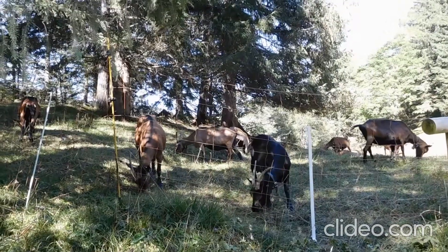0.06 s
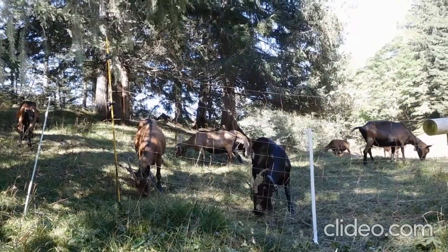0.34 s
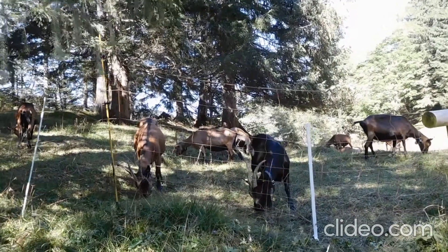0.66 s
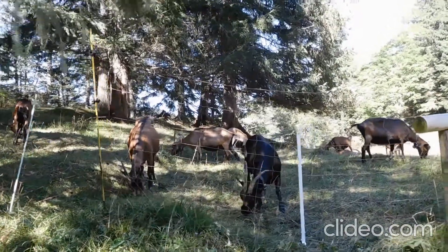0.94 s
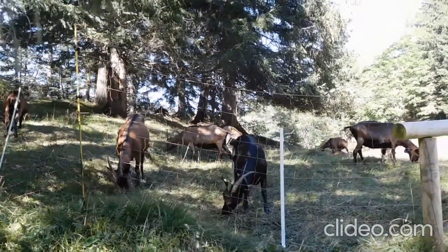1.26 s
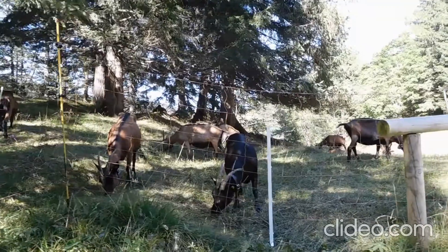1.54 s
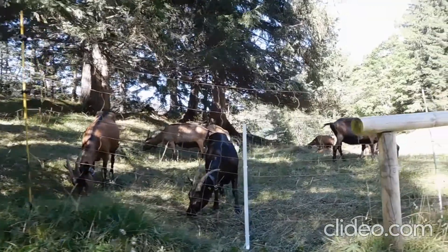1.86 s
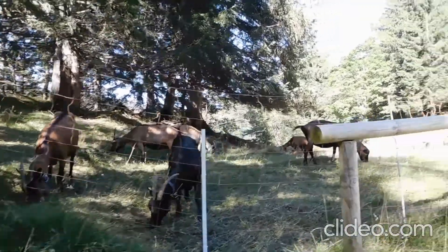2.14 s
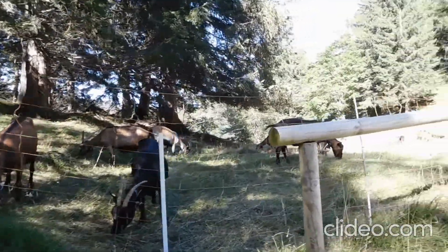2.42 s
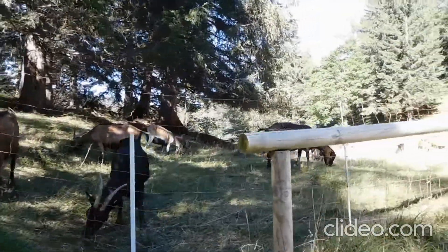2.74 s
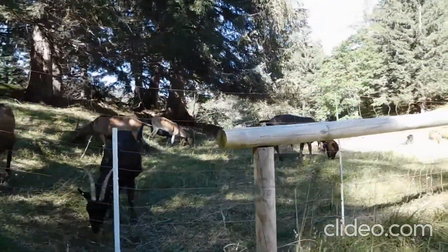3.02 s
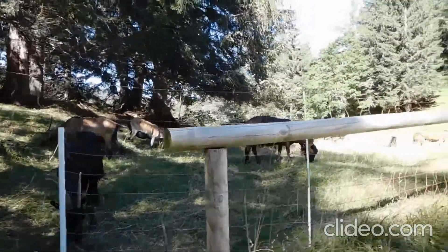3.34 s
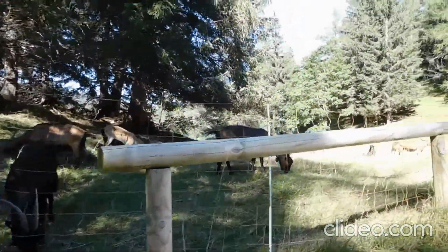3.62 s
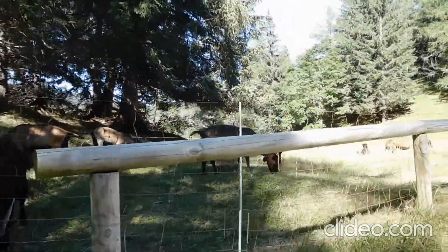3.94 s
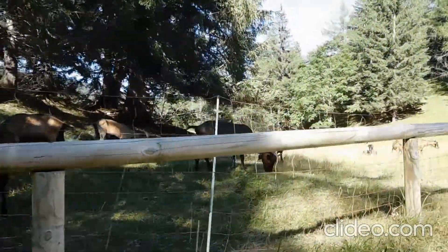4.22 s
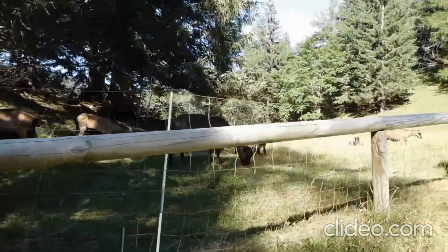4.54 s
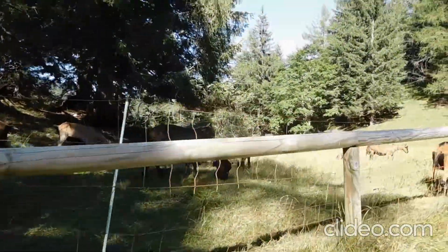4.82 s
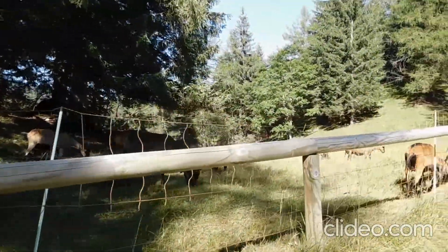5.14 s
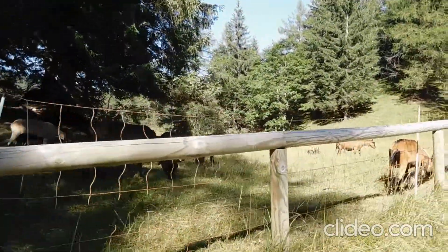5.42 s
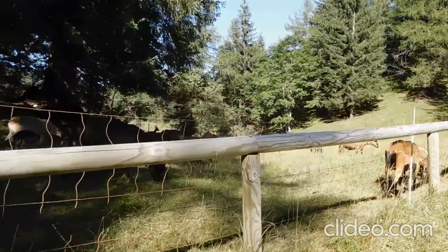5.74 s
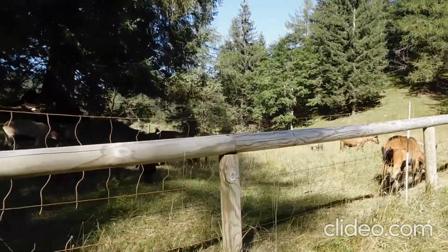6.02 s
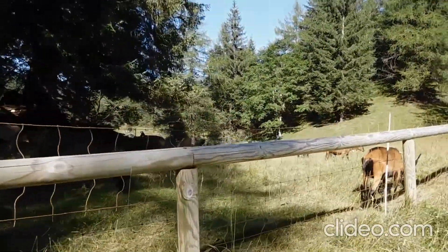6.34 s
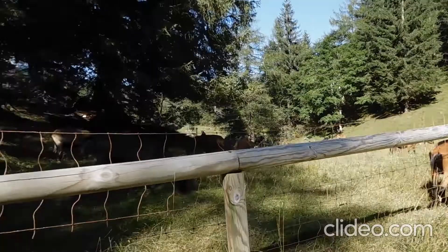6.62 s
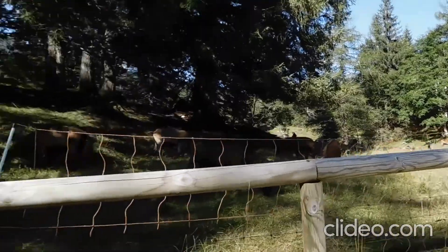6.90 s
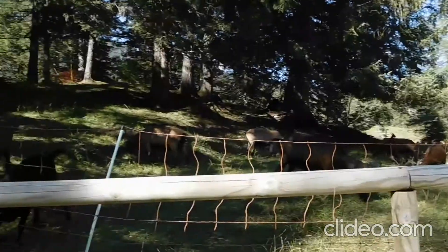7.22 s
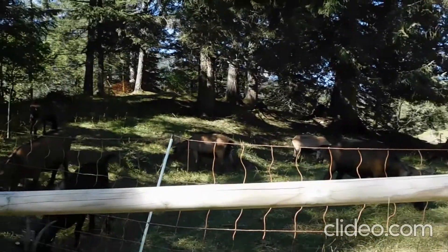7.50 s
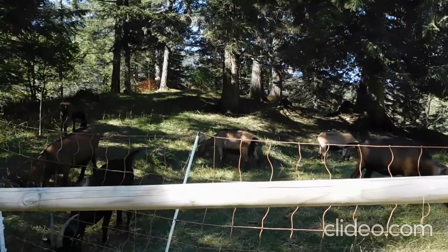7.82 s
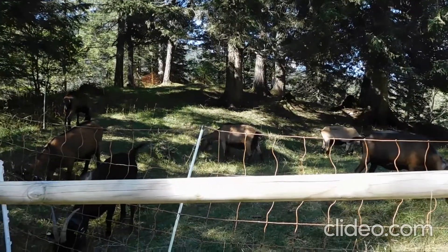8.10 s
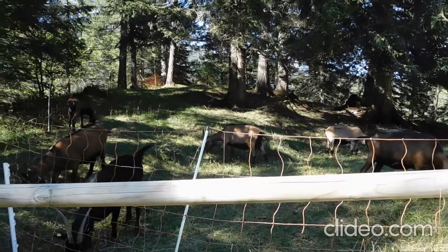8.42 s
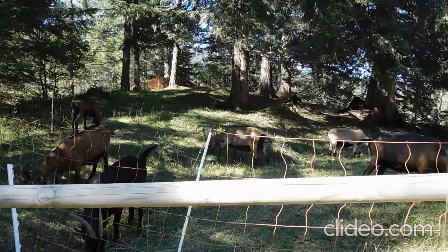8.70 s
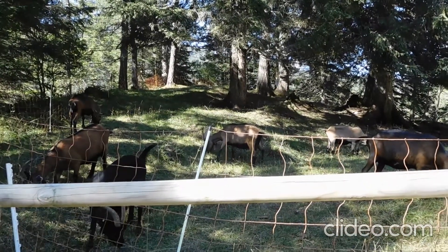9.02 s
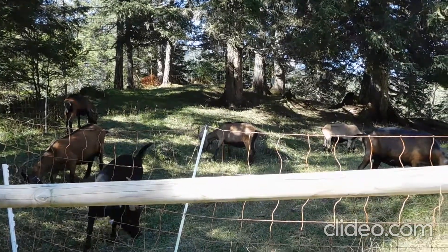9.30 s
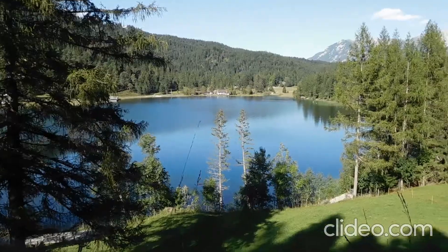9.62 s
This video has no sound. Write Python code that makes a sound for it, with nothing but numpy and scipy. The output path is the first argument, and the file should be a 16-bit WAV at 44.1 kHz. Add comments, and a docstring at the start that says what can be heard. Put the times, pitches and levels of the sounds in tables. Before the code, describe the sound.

Bells on grazing goats clank and ring near and far over a faint rumble of air, followed by wind hissing in trees.

```python
"""Goat bells tinkle and clonk over a low rumble of air at the edge of a spruce wood: three near, three far.
As the goats tug at the grass, clappers knock, skip and slide on the sheet metal and set its modes ringing.
The microphone turns to a faintly hissing meadow and back; hooves tread the grass and snap dry twigs.
The pasture stops abruptly; after a short silence a soft wind hisses in trees above a lake."""
import sys
import numpy as np
from scipy import signal
from scipy.fft import rfft, irfft, next_fast_len
from scipy.io import wavfile
from scipy.ndimage import uniform_filter1d

SR = 44100
rng = np.random.default_rng(int(sys.argv[2]) if len(sys.argv) > 2 else 0)


def waveform_to_disk(signal):
    """Save audio, clipped to [-1, 1], as 16-bit WAV at the path in sys.argv[1]."""
    frames = np.transpose(np.atleast_2d(signal))
    scaled = np.clip(frames, -1, 1) * 32767
    samples = np.round(scaled).astype(np.int16)
    wavfile.write(sys.argv[1], SR, samples)


N = 426006
TIME = np.arange(N) / SR
RING_TIME = TIME[:SR]
PASTURE_END_S, LAKE_START_S = 9.207, 9.372
CUTOFF_HZ = 15750


def from_db(db):
    """Decibels to gain."""
    return 10 ** (np.asarray(db) / 20)


def curve(rows, at):
    """Read a two-column table between its rows."""
    return np.interp(at, *np.transpose(rows))


def decay(s, t60):
    """Falls by 60 dB in t60 seconds."""
    return np.exp(-np.log(1000) * s / t60)


def flicker(per_s):
    """A random line that takes a new value per_s times a second."""
    return np.interp(TIME * per_s, np.arange(N), rng.standard_normal(N))


def add(track, s, sound):
    """Mix a sound in from time s on."""
    start = max(int(s * SR), 0)
    part = track[..., start:start + sound.shape[-1]]
    part += sound[..., :part.shape[-1]]


def noise(spectrum, alike):
    """Stereo noise of rms 1 with the given colour and left-right likeness."""
    hz, db = np.transpose(spectrum)
    size = next_fast_len(N)
    bins = np.maximum(np.arange(size // 2 + 1) * SR / size, 1)
    colour = from_db(np.interp(np.log(bins), np.log(hz), db, left=-80))
    mid, side = irfft(rfft(rng.standard_normal((2, size))) * colour, size)[:, :N]
    both = np.sqrt(1 + alike) * mid + np.sqrt(1 - alike) * np.array([side, -side])
    return both / both.std()


# Air and grass around the microphone. Each row: frequency in Hz, relative density in dB.
RUMBLE_SPECTRUM = [(12, -52.5), (20, -2.5), (38, 3), (70, -5.5), (96, -3), (146, -18), (180, -17.5),
                   (230, -19.5), (400, -120)]
RUSTLE_SPECTRUM = [(120, 3), (250, 2.5), (500, 2), (1000, 7.5), (2000, 1), (3500, -4), (6000, -6),
                   (16000, -27)]
# A faint drone in the distance. Each row: frequency in Hz, rms level in dB.
DRONE_TONES = [(95, -66.5), (203, -64), (214, -63)]


def air(rumble_db, rustle_db, gust_s=5.44, gust_width_s=0.47, gust_db=6):
    """The air rumbles and swells once in a light gust, grass rustles, a far drone wavers."""
    swell_db = gust_db * np.exp(-((TIME - gust_s) / gust_width_s) ** 2)
    rumble = from_db(rumble_db + swell_db) * noise(RUMBLE_SPECTRUM, alike=0.78)
    rustle = from_db(rustle_db + 3 * flicker(60)) * noise(RUSTLE_SPECTRUM, alike=0.39)
    drifts = 4.105 * np.cumsum(rng.standard_normal((len(DRONE_TONES), N)), axis=1) / np.sqrt(SR)
    drone = sum(from_db(db) * np.sqrt(2) * np.sin(2 * np.pi * hz * TIME + drift)
                for (hz, db), drift in zip(DRONE_TONES, drifts))
    return rumble + rustle + drone


# A bell sounds in five registers. A full blow: start in seconds, then a relative level in dB for each.
CLONK, CLANK, HUM, RING, SHIMMER = range(5)


def touches(blows, rebound_db, gap_s, skips, fade_db):
    """After each blow the clapper skips on the rim at uneven gaps, too lightly for a clonk."""
    for s, *register_db in blows:
        yield s, np.array(register_db)
        for k, later in enumerate(np.cumsum(gap_s * rng.uniform(.3, 1.7, skips))):
            weaker_db = rebound_db - fade_db * k + 2 * rng.standard_normal()
            yield s + later, np.array(register_db) - [20, 8, 8, 8, 0] + weaker_db


def jiggles(blows, jiggle_db, per_s=2, spread_db=5.5):
    """Each tug at the grass taps the clapper lightly; the livelier the blows, the stronger the taps."""
    times, *registers = np.transpose(blows)
    for k, (late, force) in enumerate(rng.random((int(per_s * PASTURE_END_S), 2))):
        s = (k + late) / per_s
        liveliness_db = np.array([np.interp(s, times, column) for column in registers])
        yield s, liveliness_db - [3, 0, 0, 0, 0] + jiggle_db + spread_db * (2 * force - 1)


def overtones(level_db, t60=.26, low_hz=6360, count=42):
    """The crowd of weak, unevenly spaced high modes of a folded metal shell."""
    hz = low_hz + (CUTOFF_HZ - low_hz) * (np.arange(count) + rng.random(count)) / count
    return np.column_stack([hz, np.full(count, level_db), np.full(count, t60)])


def ringing(hz, t60):
    """Sine and cosine ring of each mode; the jiggle on the collar makes each pitch waver a little."""
    s, hz, t60 = RING_TIME, hz[:, None], t60[:, None]
    build_up = 1 - np.exp(-s / (0.29 / hz + 0.00091))
    envelope = build_up * decay(np.minimum(s, 3 * t60), t60) * np.minimum(1, 10 * (1 - s))
    jiggle_hz, start = rng.uniform(4, 9, hz.shape), rng.random(hz.shape)
    travel_s = 2.5e-5 * np.sin(2 * np.pi * (jiggle_hz * s + start))
    angle = 2 * np.pi * hz * (s + travel_s - travel_s[:, :1])
    return np.vstack([envelope * np.sin(angle), envelope * np.cos(angle)]).astype(np.float32)


def chokes(landings, loss_db=1):
    """Each landing of the clapper damps what still rings: the gain left after all landings so far."""
    landed = np.searchsorted(np.sort([s for s, _ in landings]), np.arange(N + SR) / SR)
    return from_db(-loss_db * uniform_filter1d(landed.astype(float), size=88)).astype(np.float32)


# Clapper against rim, metal on metal. Each row: frequency in Hz, relative density in dB.
CONTACT_SPECTRUM = [(400, -26), (900, 5), (2750, 3), (3750, 5.5), (4300, -0.5), (5350, 6), (6600, 4.5),
                    (12000, 1), (16000, 3.5)]


def shell_noise(modes, width_hz, direct_db):
    """Friction noise, partly direct and partly sung through the modes of the metal; rms 1."""
    size = next_fast_len(N)
    bins = np.arange(size // 2 + 1) * SR / size
    grid = np.arange(0, SR // 2, 10)
    peaks = sum(1 / (1 + ((grid - hz) / width_hz) ** 2) for hz, *_ in modes)
    response = from_db(direct_db) + np.interp(bins, grid, np.minimum(peaks, 1))
    sung = irfft(rfft(noise(CONTACT_SPECTRUM, alike=0.6), size) * response, size)[:, :N]
    return sung / sung.std()


def knocks(blows, contact, level_db):
    """Each blow begins with a short crack of contact noise that follows its shimmer level."""
    s, envelope = RING_TIME[:SR // 10], np.zeros(N)
    knock = (.4 * decay(s, 0.08) + 3 * decay(s, 0.02)) * (1 - np.exp(-s / 0.00014))
    for at, *_, shimmer_db in blows:
        add(envelope, at, from_db(level_db + shimmer_db) * knock)
    return envelope * contact


# The microphone turns to the meadow and back. Each row: time in seconds, degrees to the right.
MIC_TURN = [(0, 9.5), (1.5, 16.6), (2.3, 29.7), (2.9, 35), (4.4, 42), (6.4, 84), (7, 45), (7.4, 29),
            (9.2, 16.4)]
# Its right port hears more clonk, its left more shimmer. Each row: frequency in Hz, left minus right in dB.
MIC_BALANCE = [(2500, -1.2), (8000, 2.3)]
PORT_DELAY_S = .000175


def bell(modes, blows, contact, left_deg, level_db, jiggle_db, overtone_db, knock_db, rebound_db,
         gap_s, buzz, skips=2, fade_db=6):
    """Every touch of the clapper rings all modes of the shell, in a mix that varies at random."""
    hz, mode_db, t60 = np.vstack([modes, overtones(overtone_db)]).T
    register = np.select([hz > 5500, hz > 3500, t60 > .35, hz > 1500], [SHIMMER, RING, HUM, CLANK], CLONK)
    scatter = np.minimum(hz / 7000, 1) ** 2  # high modes vary most from touch to touch
    spread_db = 5 * np.maximum(scatter, .4 * (register >= HUM))
    # neighbours start in nearly opposite phase, so a close pair swells and dies in one short clonk
    start_phase = 1.25 * np.pi * np.arange(len(hz))
    # the delay between the ports tells direction only below about 4.5 kHz
    port_phase = 2 * np.pi * hz * PORT_DELAY_S / (1 + (hz / 4500) ** 60)
    sides = np.array([[.5], [-.5]])
    times, weights = [], []
    landings = list(touches(blows, rebound_db, gap_s, skips, fade_db))
    for s, register_db in [*landings, *jiggles(blows, jiggle_db)]:
        leftward = np.sin(np.radians(left_deg + curve(MIC_TURN, s)))
        strength, tilt, shift, skew = rng.standard_normal((4, len(hz)))
        pan_db = sides * (curve(MIC_BALANCE, hz) + 0.36 * leftward + 3 * tilt * scatter)
        gain = from_db(level_db + mode_db + register_db[register] + spread_db * strength + pan_db)
        pan_phase = sides * (port_phase * leftward + .7 * skew * scatter)
        phase = start_phase + np.pi / 2 * shift * scatter + pan_phase
        times.append(s)
        weights.append(np.hstack([gain * np.cos(phase), gain * np.sin(phase)]))
    strokes = (np.vstack(weights).astype(np.float32) @ ringing(hz, t60)).reshape(len(times), 2, -1)
    shell, damping = np.zeros((2, N)), chokes(landings)
    for s, stroke in zip(times, strokes):
        later = damping[max(int(s * SR), 0):][:SR]
        add(shell, s, stroke * np.minimum(later / later[SR // 500], 1))
    roughness = 1 + buzz * flicker(170)  # the loose clapper buzzes against the wall
    return shell * roughness + knocks(blows, contact, knock_db)


def far_strokes(blows, clonk_db, hum_db):
    """Full blows for a farther bell, whose clonk, clank and hum follow its ring."""
    return [(s, ring + clonk_db, ring + clonk_db, ring + hum_db, ring, shimmer)
            for s, ring, shimmer, *_ in blows]


# A tinkling bell, farther off. Each row: mode in Hz, relative level in dB, t60 in seconds.
TINKLING_MODES = [(1009, 2, 0.25), (2635, -10, 0.7), (2700, -9, 0.7), (4780, -1, 1.01), (4909, -2, 0.87),
                  (4950, -8, 0.5), (7256, -5, 0.8), (7407, -13, 0.44), (7652, 0, 0.42), (9690, -14, 0.33),
                  (9924, -8, 0.33), (10490, -16, 0.59), (12140, -13, 0.36), (12650, -17, 0.36),
                  (14780, -16, 0.37)]
# Each row: start in seconds, relative ring and shimmer in dB, an unused pitch in Hz.
TINKLING_STRIKES = [(0.006, -37.5, -39.5, 4880), (0.189, -32.5, -40, 4780), (0.35, -30.5, -61, 4950),
                    (0.917, -35.5, -29, 4780), (1.366, -29.5, -54, 4780), (1.76, -31, -35.5, 4860),
                    (1.95, -34, -42.5, 4860), (2.502, -28.5, -48, 4780), (2.61, -31.5, -38, 4940),
                    (2.857, -23, -32.5, 4930), (2.945, -22, -31, 4837), (3.03, -33, -52, 4870),
                    (3.15, -29, -30.5, 4780), (3.29, -33, -45, 4890), (3.44, -22.5, -30.5, 4830),
                    (3.49, -28.5, -38, 4835), (3.931, -35, -40, 4780), (4.031, -25.5, -24.5, 4880),
                    (4.127, -28, -28, 5000), (4.42, -25.5, -30.5, 4930), (4.51, -33, -59, 4890),
                    (4.72, -29, -31, 4830), (4.937, -30.5, -24, 4780), (5.04, -31, -73, 4780),
                    (5.15, -29.5, -28.5, 4780), (5.596, -23.5, -31.5, 4780), (6.823, -20, -25, 4780),
                    (7.245, -32.5, -30, 4909), (7.526, -31, -32.5, 4909), (7.67, -35, -33.5, 4780),
                    (7.971, -31, -48, 4780)]


def tinkling_bell(contact):
    """The clapper rattles, skipping three times after each blow."""
    blows = far_strokes(TINKLING_STRIKES, clonk_db=-4, hum_db=-5)
    return bell(TINKLING_MODES, blows, contact, left_deg=-28, level_db=-4.5, jiggle_db=-18,
                overtone_db=-29.5, knock_db=-14.5, rebound_db=-9, gap_s=.024, buzz=.26, skips=3, fade_db=3)


def wood_echo(sound, level_db, t60, dull_hz):
    """Trunks and the slope scatter a thin, dull tail back."""
    tail = rng.standard_normal((2, SR)) * decay(RING_TIME, t60) * (1 - np.exp(-RING_TIME / 0.0089))
    tail /= np.sqrt(np.sum(tail ** 2, axis=1, keepdims=True))
    tail = signal.sosfilt(signal.butter(1, dull_hz, fs=SR, output="sos"), tail)
    return from_db(level_db) * signal.fftconvolve(sound, tail, axes=1)[:, :N]


def rubs(rows, friction, grain_db, grains_per_s):
    """Short swells of stick-and-slip noise."""
    swell = np.zeros(N)
    for s, length_s, db in rows:
        add(swell, s, from_db(db) * np.hanning(int(length_s * SR)) ** .5)
    return swell * from_db(grain_db * flicker(grains_per_s)) * friction


def scrapes(strikes, contact, lead_s=0.044, length_s=0.11):
    """The clapper slides along the rim around each blow, louder the more the blow shimmers."""
    slides = [(s - lead_s, length_s, shimmer_db - 22) for s, *_, shimmer_db, _ in strikes]
    return rubs(slides, contact, grain_db=2.5, grains_per_s=330)


# A singing bell, farther off. Each row: mode in Hz, relative level in dB, t60 in seconds.
SINGING_MODES = [(1571, -16, 1.1), (1677, 2, 0.56), (1719, -10, 1.1), (2627, -18, 0.7), (2691, -12, 0.7),
                 (4023, -9, 1.1), (4091, -22, 0.54), (4390, -12, 1.1), (7477, -10, 0.8), (7542, -15, 0.8),
                 (7803, -10, 0.56), (11288, -8, 0.34), (11372, -18, 0.57), (15210, -17, 0.51)]
# Each row: start in seconds, relative ring and shimmer in dB.
SINGING_STRIKES = [(0.226, -41, -31), (1.79, -34.5, -56), (2.391, -28.5, -38.5), (2.503, -33.5, -37.5),
                   (3.264, -34, -40), (3.649, -35.5, -39), (3.817, -37, -37.5), (4.242, -33.5, -44),
                   (4.59, -33.5, -42), (4.734, -31, -39.5), (5.343, -33.5, -32.5), (6.1, -39, -43),
                   (6.325, -34.5, -40), (6.593, -35, -45), (7.623, -40.5, -30.5), (7.884, -27, -39),
                   (8.218, -36.5, -43)]


def singing_bell(contact):
    """Long-lived modes near 1.7 kHz sing on after each blow."""
    blows = far_strokes(SINGING_STRIKES, clonk_db=-4.5, hum_db=-6.5)
    return bell(SINGING_MODES, blows, contact, left_deg=0.81, level_db=6, jiggle_db=-8.5,
                overtone_db=-45, knock_db=-13, rebound_db=-7.5, gap_s=.024, buzz=.24, skips=1)


# A bell close to the microphone. Each row: mode in Hz, relative level in dB, t60 in seconds.
NEAR_MODES = [(916, -1, 0.12), (963, -1, 0.12), (1876, -18, 0.45), (2424, 0, 0.14), (2464, 0, 0.18),
              (2613, -24, 0.84), (2947, -18, 0.67), (4082, -17, 1.1), (4184, -9, 0.73), (4280, -16, 0.75),
              (4993, -22, 1.1), (6309, -18, 0.46), (6383, -13, 0.48), (6696, -24, 0.63), (6888, -11, 0.39),
              (7695, -20, 0.38), (8766, -15, 0.38), (8833, -14, 0.29), (9488, -14, 0.31),
              (10096, -14, 0.38), (11539, -19, 0.31), (13232, -15, 0.24), (14298, -21, 0.27)]
# Each row: start in seconds, relative clonk, clank, hum, ring and shimmer in dB, an unused pitch in Hz.
NEAR_STRIKES = [(0.227, -20, -23, -26, -23, -21.5, 4993), (0.309, -54.5, -32, -17, -19.5, -25, 4082),
                (0.528, -17.5, -19, -34, -16, -25, 4184), (0.85, -24.5, -27.5, -55, -14.5, -22.5, 4184),
                (1.1, -25.5, -30, -29, -14.5, -23, 4082), (1.422, -15, -24.5, -12.5, -11, -19, 4232),
                (1.642, -21.5, -28, -50, -21, -22.5, 4184), (2.246, -18, -22.5, -17, -13, -21.5, 4280),
                (2.701, -26, -23, -14, -34, -28, 4082), (2.722, -24.5, -23, -18, -16.5, -20, 4082),
                (2.818, -27.5, -20, -17, -12.5, -26, 4133), (3.765, -20.5, -25, -24, -36, -36, 4993),
                (3.793, -31.5, -32, -45, -37.5, -52, 4082), (4.026, -29.5, -29, -22, -14, -32.5, 4993),
                (4.417, -33, -20, -32, -30, -35.5, 4184), (4.55, -30, -22.5, -29, -44, -60, 4082),
                (4.676, -42, -25.5, -30, -39, -33, 4993), (5.477, -34, -27, -16, -26, -21, 4184),
                (5.716, -35, -29, -41, -37, -68, 4993), (5.826, -28.5, -26.5, -39, -23.5, -56, 4280),
                (6.232, -29, -23.5, -21, -18.5, -21, 4082), (6.497, -23, -16, -28, -36, -33, 4184),
                (6.954, -32, -33, -10.5, -21, -20.5, 4082), (7.205, -22.5, -26.5, -13, -21, -21, 4082),
                (7.502, -16.5, -17, -13.5, -19, -24, 4184), (7.698, -25.5, -23.5, -15, -17.5, -20, 4184),
                (8.05, -22, -23.5, -34, -25, -35, 4184), (8.108, -18, -19, -21, -26, -34, 4082),
                (8.192, -21, -16.5, -14, -14, -24.5, 4184), (8.342, -25, -25.5, -21, -28, -35.5, 4280),
                (8.658, -20.5, -19.5, -18, -14.5, -20.5, 4184),
                (8.951, -18, -18.5, -16.5, -17.5, -21.5, 4184), (9.104, -21, -24, -34, -46, -33.5, 4082)]


def near_bell(contact):
    """Close pairs of modes near 1 and 2.5 kHz make the hollow clonk."""
    blows = [row[:-1] for row in NEAR_STRIKES]
    return bell(NEAR_MODES, blows, contact, left_deg=0.95, level_db=-1.5, jiggle_db=-8.5,
                overtone_db=-26, knock_db=-18, rebound_db=-10.5, gap_s=.014, buzz=.15)


# The smallest of the close bells. Each row: mode in Hz, relative level in dB, t60 in seconds.
SMALL_MODES = [(1045, 1, 0.1), (1097, 1, 0.1), (2562, -18, 0.68), (2702, 1, 0.13), (2756, 1, 0.13),
               (4328, -14, 0.86), (4457, -8, 0.41), (4486, -11, 0.82), (4947, -18, 1.1), (6519, -21, 0.76),
               (7184, -16, 0.8), (8750, -17, 0.41), (8922, -15, 0.33), (10432, -17, 0.28),
               (10553, -16, 0.38), (11200, -25, 0.41), (12316, -20, 0.35), (12798, -22, 0.26),
               (12868, -25, 0.42), (13552, -16, 0.22)]
# Each row: start in seconds, relative clonk, clank, ring and shimmer in dB, an unused pitch in Hz.
SMALL_STRIKES = [(0.282, -27, -23.5, -27, -27.5, 4457), (0.627, -23, -18.5, -19.5, -19, 4486),
                 (0.969, -29, -25, -24, -24, 4486), (1.507, -19.5, -22.5, -25, -18, 4328),
                 (1.608, -27.5, -40, -62, -32, 4328), (2.018, -27, -23.5, -23.5, -20.5, 4947),
                 (2.302, -29, -23, -23, -17.5, 4486), (2.324, -49, -26, -17.5, -26, 4486),
                 (2.63, -44.5, -34, -44, -34, 4486), (2.978, -27, -21.5, -25, -26, 4947),
                 (3.207, -26, -24, -25, -31.5, 4457), (3.411, -31.5, -44, -35, -29, 4947),
                 (3.689, -29, -24, -23.5, -23.5, 4486), (3.987, -26, -33, -15.5, -18, 4457),
                 (4.357, -42.5, -31, -24, -25, 4486), (4.585, -30, -23, -24, -22.5, 4457),
                 (4.801, -32, -21, -32, -31.5, 4457), (5.028, -39, -21, -23, -34, 4947),
                 (5.471, -25, -21, -27, -45, 4328), (5.827, -21, -22, -19, -18, 4486),
                 (6.081, -28, -16, -56, -26, 4486), (6.904, -22, -28, -18, -21, 4486),
                 (7.182, -30, -34, -31.5, -29, 4486), (7.719, -23.5, -27, -25.5, -22.5, 4457),
                 (8.163, -28, -25, -29.5, -26, 4328), (8.761, -23.5, -20.5, -26, -19.5, 4457),
                 (9.063, -32, -34, -30.5, -35.5, 4486)]


def small_bell(contact):
    """A smaller shell clonks higher; its hum follows its clank."""
    blows = [(s, clonk, clank, clank, ring, shimmer) for s, clonk, clank, ring, shimmer, _ in SMALL_STRIKES]
    return bell(SMALL_MODES, blows, contact, left_deg=19.6, level_db=-1, jiggle_db=-8.5,
                overtone_db=-25.5, knock_db=-21, rebound_db=-17.5, gap_s=.017, buzz=.2)


# Harsh cracks from the close bells. Each row: time of the peak in seconds, relative level in dB.
RIM_GRATES = [(0.532, -31), (0.608, -34), (0.628, -28.5), (1.099, -26.5), (1.422, -27), (1.513, -24),
              (2.021, -26), (2.731, -24.5), (2.819, -31), (2.945, -33), (3.413, -28.5), (3.988, -20.5),
              (4.939, -40), (5.478, -23), (5.828, -23), (6.906, -29), (6.955, -20), (7.726, -29),
              (8.194, -26), (8.612, -32), (8.659, -20)]


def grates(level_db, bite_t60=.015, slip_t60=.045):
    """A clapper's edge bites the rim, then slips off: a few milliseconds of tiny, hard impacts."""
    s, swell = RING_TIME[:SR // 10] - .05, np.zeros(N)
    burst = decay(np.abs(s), np.where(s < 0, bite_t60, slip_t60))
    for at, db in RIM_GRATES:
        add(swell, at + s[0], from_db(db + level_db) * burst)
    impacts = from_db(3 * flicker(1500))
    return swell * impacts * shell_noise([*NEAR_MODES, *SMALL_MODES], width_hz=60, direct_db=-7)


# The deepest of the close bells. Each row: mode in Hz, relative level in dB, t60 in seconds.
DEEP_MODES = [(912, 5, 0.12), (958, 5, 0.12), (1790, -17, 0.63), (2404, 2, 0.15), (2442, 2, 0.15),
              (2645, -10, 0.59), (2933, -12, 0.52), (4035, -15, 1.1), (4123, -8, 0.85), (4204, -13, 0.62),
              (4866, -17, 0.48), (6233, -16, 0.49), (6804, -20, 0.4), (8599, -12, 0.35), (9969, -15, 0.55),
              (10047, -18, 0.54), (11735, -16, 0.29), (12855, -13, 0.26)]
# Each row: start in seconds, relative clonk, clank, hum, ring and shimmer in dB, an unused pitch in Hz.
DEEP_STRIKES = [(1.072, -32, -46, -20, -48, -21.5, 4035), (2.154, -33, -45, -28.5, -54, -30, 4035),
                (3.924, -32, -42, -34, -48, -38, 4866), (4.082, -27.5, -24.5, -21, -26, -18.5, 4123),
                (4.296, -26.5, -34.5, -26, -27, -21.5, 4866), (5.907, -29.5, -24, -40, -21, -20, 4123),
                (5.991, -26.5, -28.5, -27, -13, -21.5, 4204), (6.289, -26.5, -24, -28, -37, -50, 4123),
                (7.396, -27.5, -27, -17, -25, -15.5, 4035), (7.838, -23, -24, -14.5, -26, -15, 4123),
                (8.505, -27.5, -34.5, -27, -32, -22.5, 4123), (8.533, -23.5, -21.5, -20, -18.5, -28, 4123),
                (8.616, -24, -41, -37, -32.5, -36.5, 4204), (8.899, -21.5, -16.5, -19.5, -18, -17, 4123)]


def deep_bell(contact):
    """A strong pair of modes just above 900 Hz gives a full clonk."""
    blows = [row[:-1] for row in DEEP_STRIKES]
    return bell(DEEP_MODES, blows, contact, left_deg=-35, level_db=-4.5, jiggle_db=-9.5,
                overtone_db=-27, knock_db=-19, rebound_db=-13.5, gap_s=.023, buzz=.15)


# A bell far off to the left. Each row: mode in Hz, relative level in dB, t60 in seconds.
FAR_MODES = [(1050, -3, 0.3), (1830, -3, 1.4), (2390, -13, 1.1), (4568, 0, 1.6), (7391, -2, 0.8),
             (7899, -8, 0.73), (7953, -12, 0.65), (8890, -6, 0.8), (10876, -7, 0.8), (15055, -11, 0.57)]
# Each row: start in seconds, relative ring and shimmer in dB.
FAR_STRIKES = [(1.31, -41.5, -38), (4.13, -39.5, -46.5), (4.938, -37.5, -42.5), (5.146, -30.5, -33.5),
               (5.427, -33, -34), (5.921, -29, -35.5), (6.472, -25.5, -29.5), (6.78, -32.5, -35.5),
               (7.05, -21.5, -27), (7.36, -31, -31.5), (9.028, -42, -41)]


def far_bell(contact):
    """A few slowly dying modes ring clear, with hardly any knock."""
    blows = far_strokes(FAR_STRIKES, clonk_db=-15.5, hum_db=-8.5)
    return bell(FAR_MODES, blows, contact, left_deg=81, level_db=0.5, jiggle_db=-4,
                overtone_db=-38, knock_db=-30, rebound_db=-14, gap_s=.023, buzz=.08, skips=1)


# The sunny meadow off to the right. Each row: frequency in Hz, relative density in dB.
MEADOW_SPECTRUM = [(7000, -21), (10000, -24), (13000, -10.5), (15000, -0.5), (16000, 0)]


def meadow(level_db, right_deg=74, width_deg=53):
    """A fine hiss, probably grasshoppers, comes up while the microphone points at the meadow."""
    facing = np.exp(-((curve(MIC_TURN, TIME) - right_deg) / width_deg) ** 2)
    return from_db(level_db) * facing * noise(MEADOW_SPECTRUM, alike=1)


# Hooves in the grass nearby. Each row: start in seconds, length in seconds, relative level in dB.
HOOF_STEPS = [(2.43, 0.045, -50), (5.15, 0.14, -48), (5.943, 0.032, -38), (8.55, 0.051, -46)]
# Each row: frequency in Hz, relative density in dB.
HOOF_SPECTRUM = [(40, -19), (150, 5.5), (450, 6), (800, 7), (2000, -30), (8000, -42)]


def hooves():
    """A hoof presses into the grass with a dull, grainy rub."""
    return rubs(HOOF_STEPS, noise(HOOF_SPECTRUM, alike=1), grain_db=5, grains_per_s=150)


# Twigs snap under hooves nearby. Each row: start in seconds, relative peak in dB.
TWIG_SNAPS = [(8.2927, -10.5), (8.3625, -5), (8.4128, -1.5), (8.5693, -14), (8.599, -19)]
# A hoof drags through them. Each row: start in seconds, length in seconds, relative level in dB.
TWIG_DRAGS = [(8.485, 0.25, -38.5)]
# The colour of the crack. Each row: frequency in Hz, relative density in dB.
TWIG_SPECTRUM = [(200, -19), (700, -11.5), (1750, 4.5), (3300, -6.5), (6500, -2.5), (9500, -5.5),
                 (16000, -10)]


def twigs(level_db, t60):
    """Dry wood breaks in a few milliseconds of splintering, and crackles under a dragging hoof."""
    s, snaps = RING_TIME[:SR // 20], np.zeros(N)
    crack = s * decay(s, t60)
    for at, peak_db in TWIG_SNAPS:
        add(snaps, at, from_db(peak_db + level_db) * crack / crack.max())
    splinters = noise(TWIG_SPECTRUM, alike=0.21)
    return snaps * splinters + rubs(TWIG_DRAGS, splinters, grain_db=5, grains_per_s=510)


# Trees above a lake. Each row: frequency in Hz, relative density in dB.
LAKE_WIND_SPECTRUM = [(18, -37), (30, -4), (53, -13), (81, -33), (204, -7.5), (374, -14.5), (962, -10),
                      (1460, -14.5), (2480, -28.5), (3770, -32), (4530, -33.5), (5590, -34.5), (16000, -43)]


def lake_wind(level_db):
    """A soft, steady wind hisses through the trees."""
    return from_db(level_db) * noise(LAKE_WIND_SPECTRUM, alike=0.52)


def scene():
    """The pasture, a short silence, then the wind by the lake."""
    contact = shell_noise([*NEAR_MODES, *DEEP_MODES, *SMALL_MODES], width_hz=18, direct_db=-20)
    goats = near_bell(contact) + deep_bell(contact) + small_bell(contact)
    goats += singing_bell(contact) + tinkling_bell(contact) + far_bell(contact)
    goats += scrapes([*NEAR_STRIKES, *DEEP_STRIKES, *SMALL_STRIKES], contact) + grates(level_db=1)
    goats += twigs(level_db=-10, t60=0.005) + hooves()
    pasture = goats + wood_echo(goats, level_db=-13, t60=.6, dull_hz=7000)
    pasture += air(rumble_db=-55, rustle_db=-47.5) + meadow(level_db=-42)
    pasture_gate = np.clip((PASTURE_END_S - TIME) / 0.005 + 1, 0, 1)
    lake_gate = np.clip((TIME - LAKE_START_S) / 0.0025, 0, 1)
    return pasture * pasture_gate + lake_wind(level_db=-36.5) * lake_gate


def record(dry):
    """The top of the treble is cut steeply."""
    return signal.sosfilt(signal.ellip(10, .1, 80, CUTOFF_HZ, fs=SR, output="sos"), dry)


dry = scene()
out = record(dry)
waveform_to_disk(out)
```